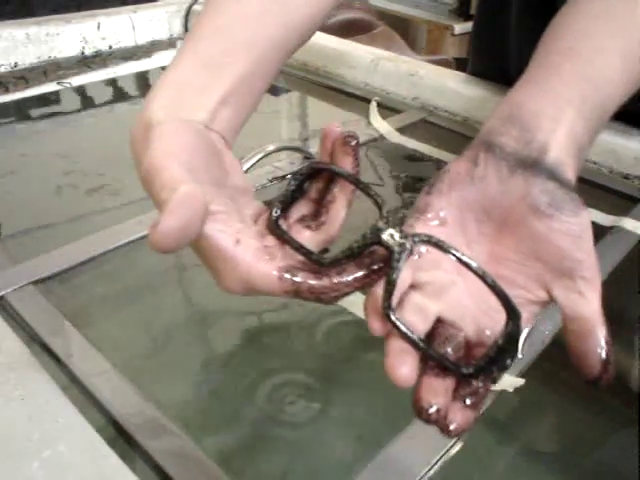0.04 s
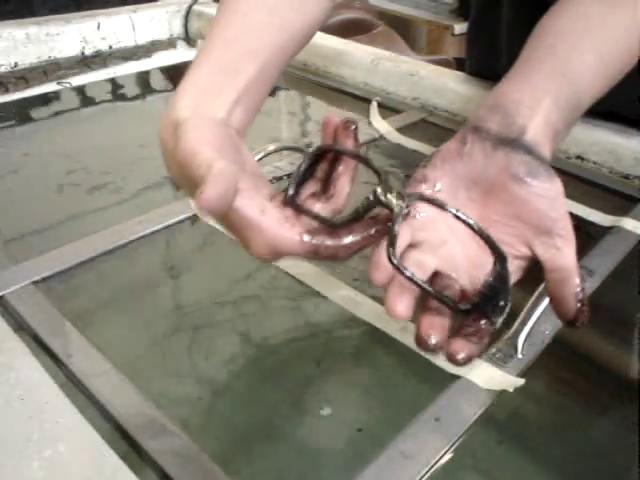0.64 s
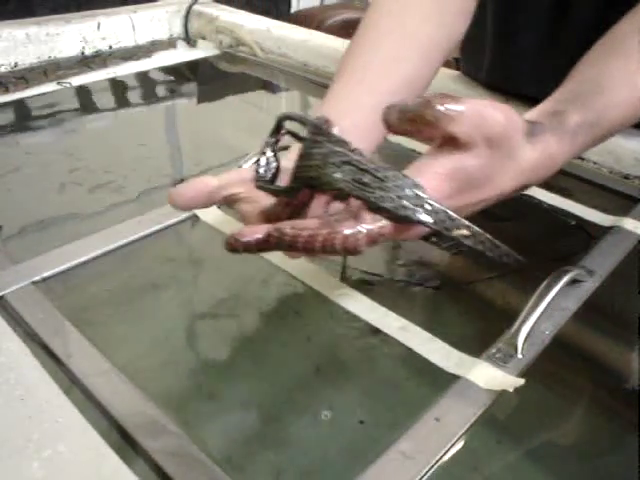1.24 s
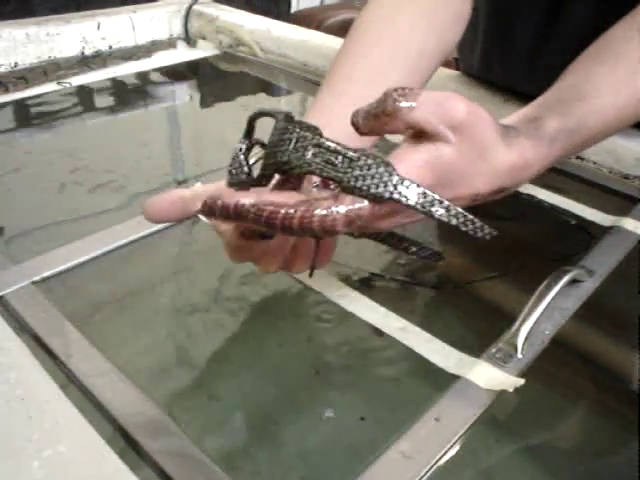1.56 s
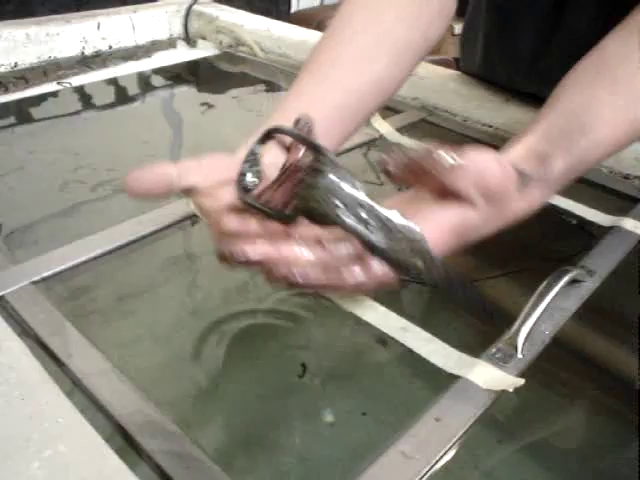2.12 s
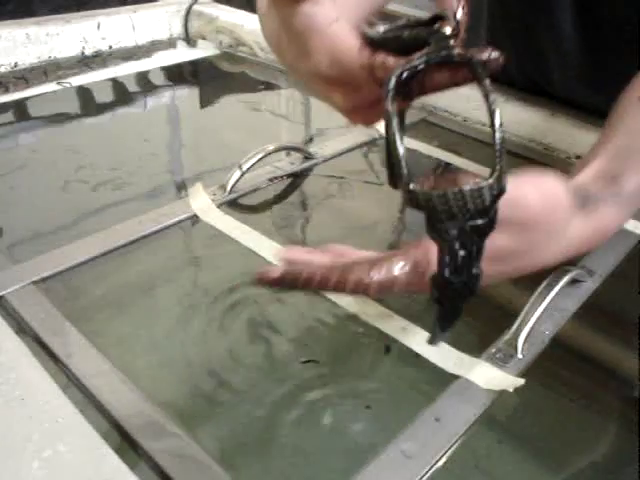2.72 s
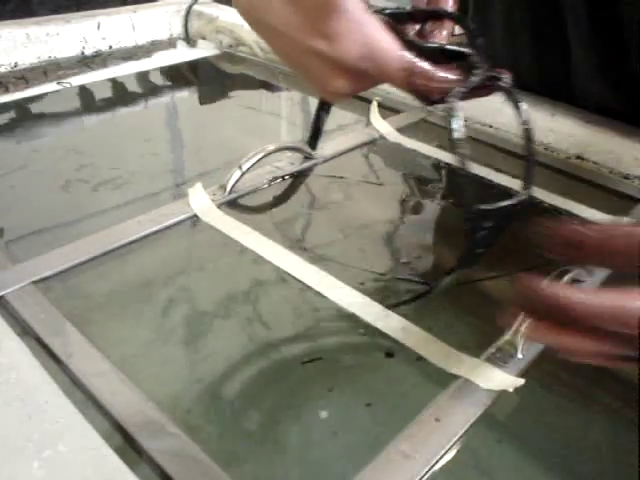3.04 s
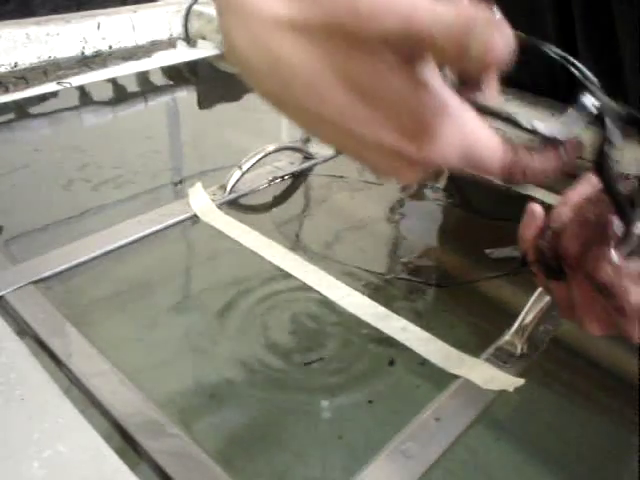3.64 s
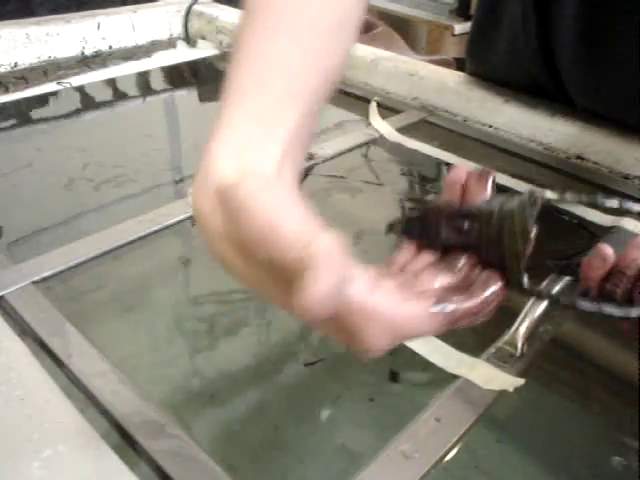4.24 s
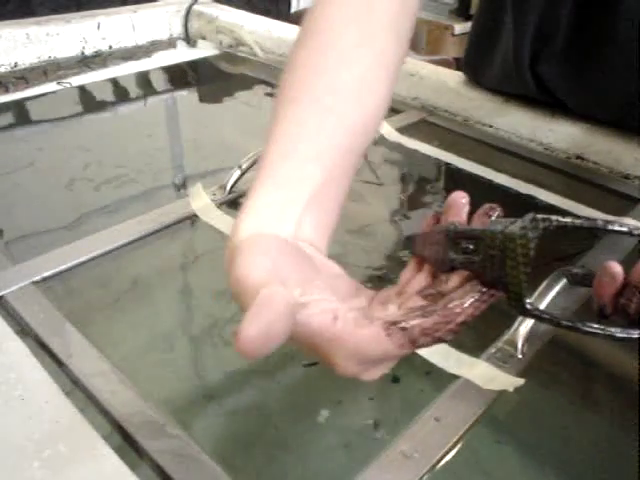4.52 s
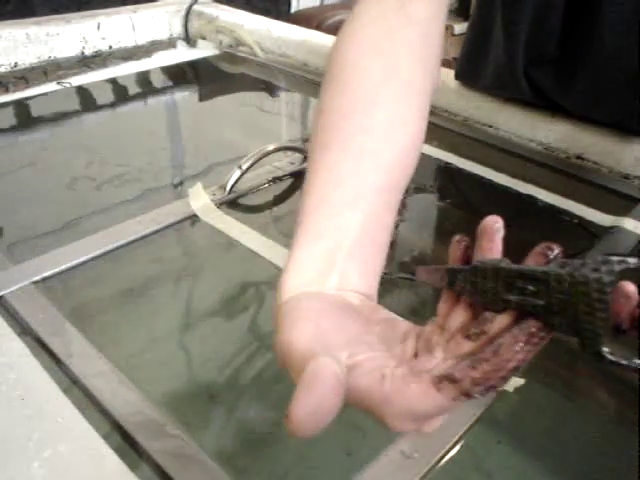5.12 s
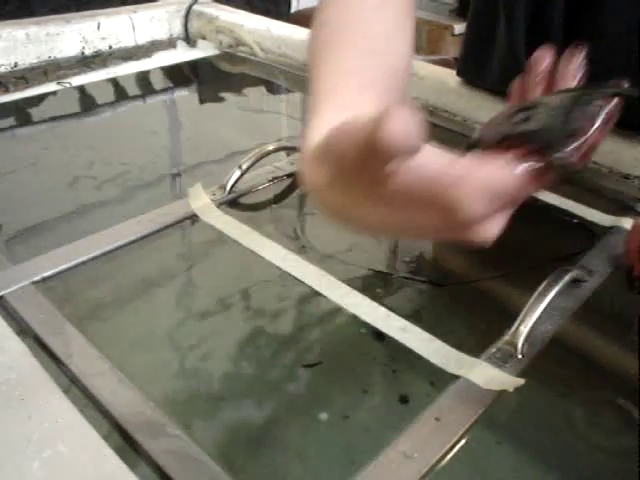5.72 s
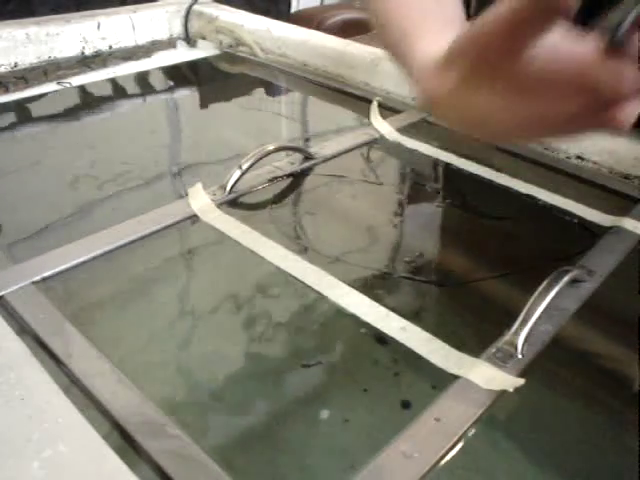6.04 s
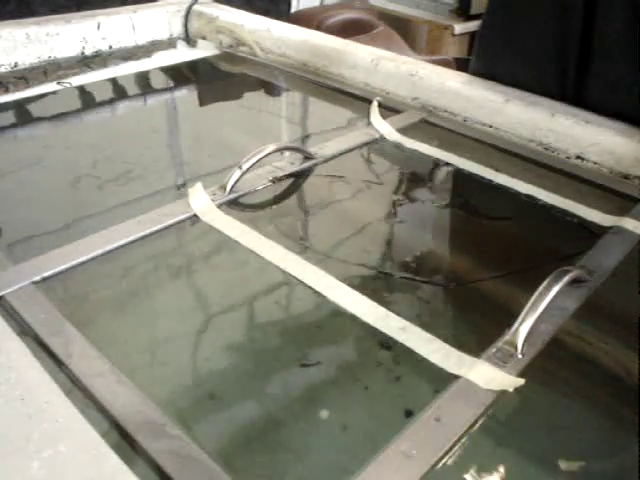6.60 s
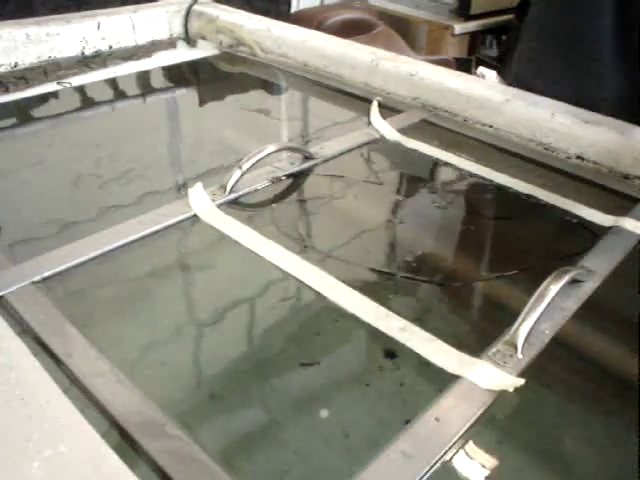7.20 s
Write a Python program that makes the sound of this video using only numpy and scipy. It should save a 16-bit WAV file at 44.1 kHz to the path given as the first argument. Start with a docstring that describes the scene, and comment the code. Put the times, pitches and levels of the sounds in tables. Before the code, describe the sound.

In a workshop, a soft rush of ventilation, electrical buzz and thin motor whine run throughout. After about a second a fan picks up speed, rising in pitch and swelling into a deep, steady drone that holds to the end. Faint, tick-like chirps from the camera's focus motor repeat about three times a second, mostly in pairs. The background dips slightly as the drone grows.

```python
"""Workshop fan restart

A fan coasts down, is switched on again and runs up to a deep, steady blade drone over
mains buzz, motor whine and ventilation noise. A camera's focus motor chirps faintly about
three times a second, mostly in pairs. Its gain control turns the room down as the drone swells."""
import sys
import numpy as np
from scipy import signal
from scipy.fft import rfft, irfft, next_fast_len
from scipy.io import wavfile
from scipy.ndimage import uniform_filter1d, map_coordinates

SR = 44100
rng = np.random.default_rng(int(sys.argv[2]) if len(sys.argv) > 2 else 0)


def bounce(signal):
    """Save signal as a 16-bit WAV file at the path given by the first command-line argument."""
    frames = np.transpose(np.atleast_2d(signal))
    limited = np.clip(frames, -1, 1)
    pcm = np.round(limited * 32767).astype(np.int16)
    wavfile.write(sys.argv[1], SR, pcm)


N = 329317


def amp(db):
    """Decibels to gain."""
    return 10 ** (np.asarray(db) / 20)


def wobble(rate_hz):
    """Smooth random curve, rate_hz knots a second."""
    knots = rng.standard_normal(int(N * rate_hz / SR) + 4)
    return map_coordinates(knots, [np.arange(N) * rate_hz / SR])


def filtered(x, response):
    """Zero-phase filter with gain response(hz)."""
    size = next_fast_len(N + SR // 2)
    return irfft(rfft(x, size) * response(np.fft.rfftfreq(size, 1 / SR)), size)[:N]


def rush(spectrum, ripple_db):
    """Coloured noise of rms 1, rippled by the room's standing waves."""
    freq_hz, level_db = np.transpose(spectrum)
    grid_hz = np.arange(0, SR / 2, 22)
    standing_db = ripple_db * rng.standard_normal(len(grid_hz))

    def colour(hz):
        smooth_db = np.interp(np.log(hz + 1), np.log(freq_hz), level_db)
        return amp(smooth_db + np.interp(hz, grid_hz, standing_db))

    noise = filtered(rng.standard_normal(N), colour)
    return noise / np.sqrt(np.mean(noise ** 2) + 1e-20)


def tone(hz):
    """Sine of rms 1, steady or moving pitch."""
    return np.sqrt(2) * np.sin(2 * np.pi * (np.cumsum(hz * np.ones(N)) / SR + rng.random()))


def resonances(humps, hz):
    """Gain of Gaussian humps at hz."""
    return sum(amp(db) * np.exp(-((hz - centre_hz) / width_hz) ** 2) for centre_hz, width_hz, db in humps)


def blade_pitch(t, switch_on_s, full_hz, start_hz=47.3, coast_tau_s=1.62, run_up_tau_s=0.4):
    """Blade-passing rate: drag slows the fan until power returns, then it climbs an S-curve."""
    coasting_hz = start_hz * np.exp(-np.minimum(t, switch_on_s) / coast_tau_s)
    powered_s = np.maximum(t - switch_on_s, 0)
    return full_hz / (1 + (full_hz / coasting_hz - 1) * np.exp(-powered_s / run_up_tau_s))


def fan(full_hz=65.18, switch_on_s=0.86, grip_s=0.08, flutter_hz=8, flutter_db=3, waver_db=0.27):
    """Blades beat out a near-pure drone that booms in each resonance; the air stream grows with speed."""
    # drone and its octave: powered_db, coasting_db
    partials = [(-17, -36), (-21, -26)]
    # low resonances: centre_hz, width_hz, gain_db
    boom = [(41.3, 3.8, -4.5), (49.3, 3.5, 0.5), (58.48, 5.25, -1.5), (66, 4.9, -1.23), (80, 24, -21.5),
            (122, 8, -15.5)]
    # duct resonances: centre_hz, width_hz, gain_db
    duct = [(133.4, 13.5, -28), (184, 9.2, -43), (282, 15, -38)]
    # air stream spectrum: freq_hz, relative_db
    air_spectrum = [(25, -32), (50, -4.5), (88, -2.5), (113, 1.5), (150, -4), (205, -8), (290, -2.5),
                    (400, -11.5), (530, -12), (1100, -26.5), (4000, -39.5), (10000, -41)]
    t = np.arange(N) / SR
    blade_hz = blade_pitch(t, switch_on_s, full_hz)
    speed = blade_hz / full_hz
    power = np.clip((t - switch_on_s) / grip_s, 0, 1)
    drone, overtones = np.zeros((2, N))
    for k, (powered_db, coasting_db) in enumerate(partials, 1):
        level_db = power * powered_db + (1 - power) * coasting_db - waver_db * wobble(3.4)
        drone += amp(level_db) * resonances(boom, k * blade_hz) * tone(k * blade_hz)
    for k in (3, 5):  # rough overtones flare as they cross the duct's resonances
        flare = resonances(duct, k * blade_hz) * amp(flutter_db * wobble(25))
        overtones += flare * tone(k * blade_hz + flutter_hz * wobble(40))
    air = amp(-35.5) * speed ** 2.3 * rush(air_spectrum, ripple_db=1.36)
    return speed ** 1.85 * drone + power * speed ** 3 * overtones + air


def mains_buzz(mains_hz=60, waver_db=1.4):
    """Magnetic buzz on even multiples of the mains."""
    # buzz partials: mains_multiple, relative_db
    harmonics = [(2, -47), (4, -47.5), (6, -52.5), (8, -53.5), (12, -51), (14, -53.5), (18, -57), (20, -60),
                 (24, -54.5), (28, -61.5)]
    return sum(amp(db + waver_db * wobble(3.02)) * tone(k * mains_hz) for k, db in harmonics)


def motor_whine(waver_db=1.5, drift_hz=0.62):
    """Other motors run slightly unsteadily; higher tones stray further in pitch."""
    # motor tones: pitch_hz, relative_db
    tones = [(217.8, -47.5), (272, -55), (435.5, -55), (498, -56), (522, -55), (654.6, -55.5), (782, -60.5),
             (923.6, -52.5), (2083, -63), (7935, -82), (8931, -75), (8963, -73.5)]
    lowest_hz = tones[0][0]
    whine = np.zeros(N)
    for hz, db in tones:
        stray_hz = drift_hz * np.sqrt(hz / lowest_hz)
        whine += amp(db + waver_db * wobble(5)) * tone(hz + stray_hz * wobble(14))
    return whine


def ventilation():
    """Steady rush of air in the room."""
    # ventilation spectrum: freq_hz, relative_db
    spectrum = [(20, -33), (42, -4.5), (155, -.5), (300, -6), (400, -9), (740, -7.5), (1130, -13.5),
                (2000, -15.5), (2500, -19.5), (3500, -22), (4300, -27), (5900, -28.5), (7500, -33),
                (10000, -37.5)]
    return rush(spectrum, ripple_db=1.5)


def focus_motor(pitch_hz=1447, scatter=0.0048, rise_s=0.0023, fall_s=0.0035, echo_db=-16, t60_s=0.22):
    """Clocked steps: each swells and dies within milliseconds on one resonance, leaving a faint tail."""
    # focus nudges: time_s, peak_db, gap_ticks (0 = no second chirp), second_accent_db
    nudges = [(.331, -38, 0, 0), (.669, -28.5, 0, 0), (1.067, -30, 0, 0), (1.736, -25.5, 0, 0),
              (2.103, -32, 1, 1.5), (2.47, -35.5, 1, 7), (2.837, -31, 1, 1), (3.205, -30, 1, 3),
              (3.538, -29.5, 2, 1), (3.905, -25.5, 1, -9), (4.272, -27.5, 1, -1.5), (4.671, -28, 0, 0),
              (4.972, -31, 2, -3), (5.339, -30, 1, 2), (5.707, -28, 1, 4), (6.074, -26, 1, -3),
              (6.473, -34, 0, 0), (6.774, -26.5, 2, -0.5), (7.141, -24, 1, -1.5)]
    tick_s, lead_s = 1 / 29.97, 0.02
    firsts = [(s, db) for s, db, _, _ in nudges]
    seconds = [(s + ticks * tick_s, db + accent_db) for s, db, ticks, accent_db in nudges if ticks]
    t = np.arange(SR // 4) / SR
    envelope = np.exp(-np.logaddexp((lead_s - t) / rise_s, (t - lead_s) / fall_s))
    envelope /= envelope.max()
    out = np.zeros(N + SR)
    for time_s, peak_db in firsts + seconds:
        hz = pitch_hz * (1 + scatter * rng.standard_normal())
        chirp = np.sin(2 * np.pi * hz * t) * envelope
        tail = rng.standard_normal(len(t)) * amp(-60 * t / t60_s)
        echo = signal.fftconvolve(chirp, tail)[:len(t)]
        echo *= np.linalg.norm(chirp) / np.linalg.norm(echo)
        start = round((time_s - lead_s) * SR)
        out[start:start + len(t)] += amp(peak_db) * (chirp + amp(echo_db) * echo)
    return out[:N]


def gain_control(x, threshold_db=-27, slope=0.45, window_s=0.058, start_db=-2.0, creep_s=1.2):
    """Gain creeps up at first; level above the threshold pulls it down."""
    width = int(window_s * SR)
    power = np.abs(uniform_filter1d(uniform_filter1d(x ** 2, width), width))
    over_db = np.maximum(10 * np.log10(power + 1e-12) - threshold_db, 0)
    creep_db = start_db * np.maximum(1 - np.arange(N) / SR / creep_s, 0)
    return x * amp(creep_db - slope * over_db)


def scene():
    """All sources at one microphone."""
    machinery = fan() + amp(-0.75) * mains_buzz() + amp(0.14) * motor_whine()
    return (machinery + amp(-37) * ventilation() + focus_motor())[None]


def record(dry):
    """The camera's gain control, then its band limit."""
    top_hz = 10120
    return filtered(gain_control(dry[0]), lambda hz: hz < top_hz)[None]


dry = scene()
out = record(dry)
bounce(out)
```